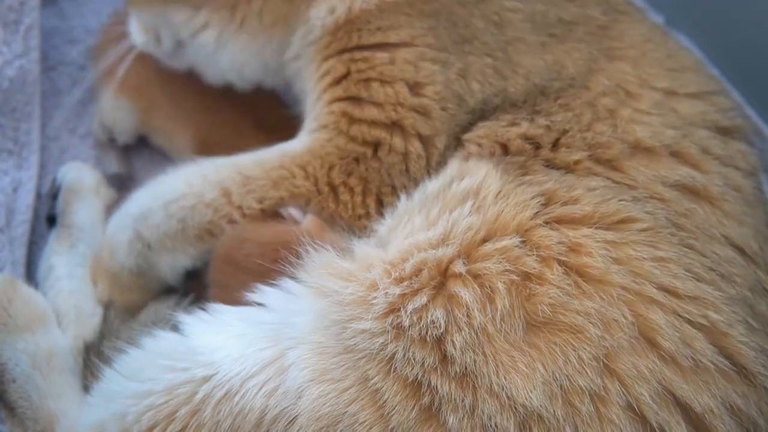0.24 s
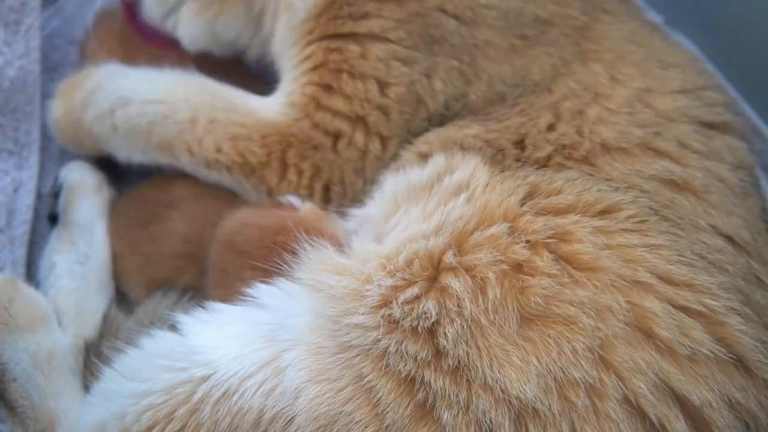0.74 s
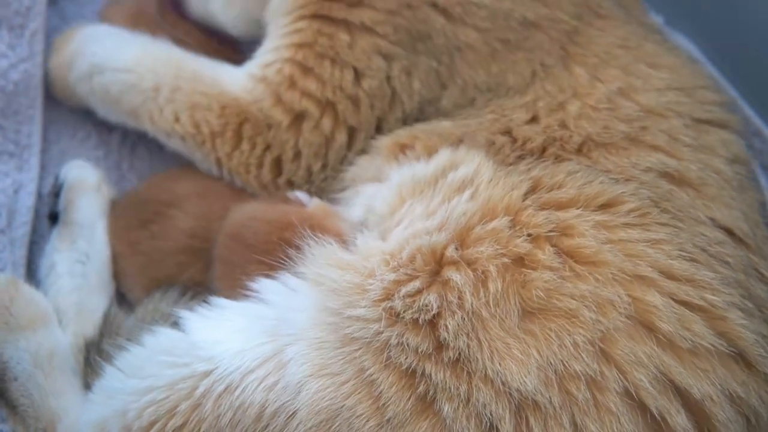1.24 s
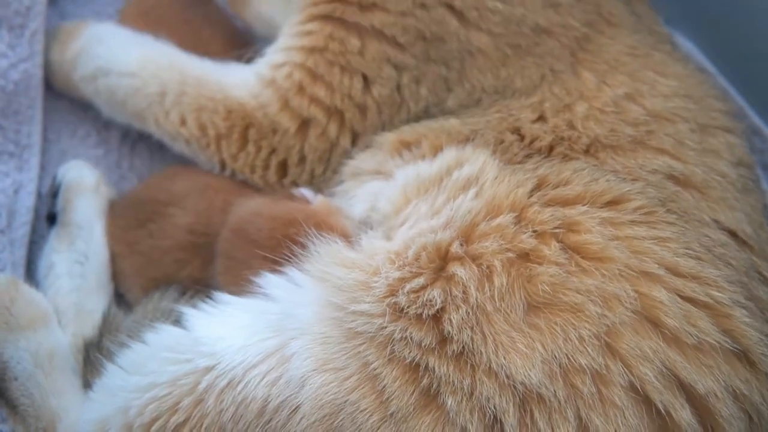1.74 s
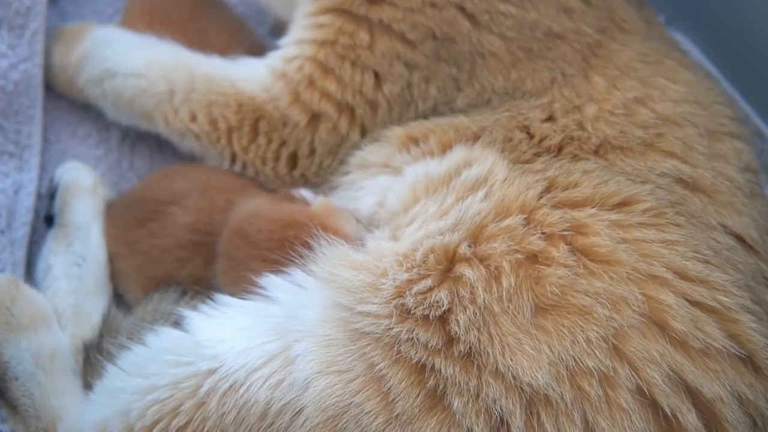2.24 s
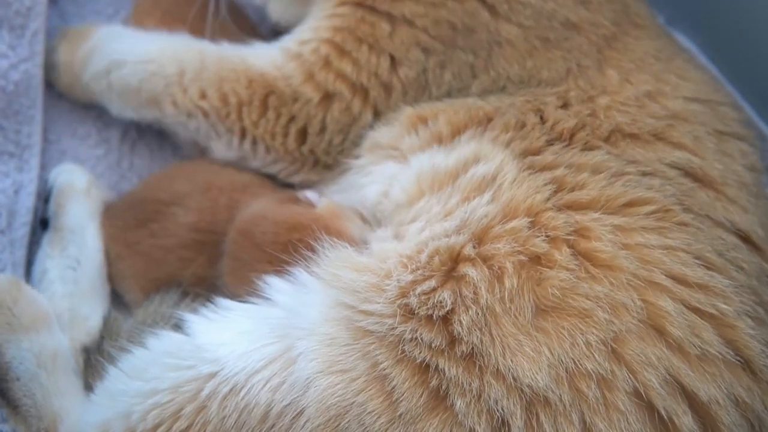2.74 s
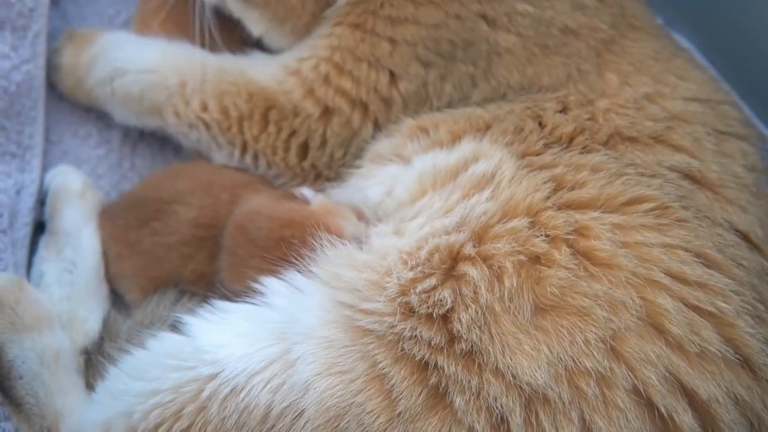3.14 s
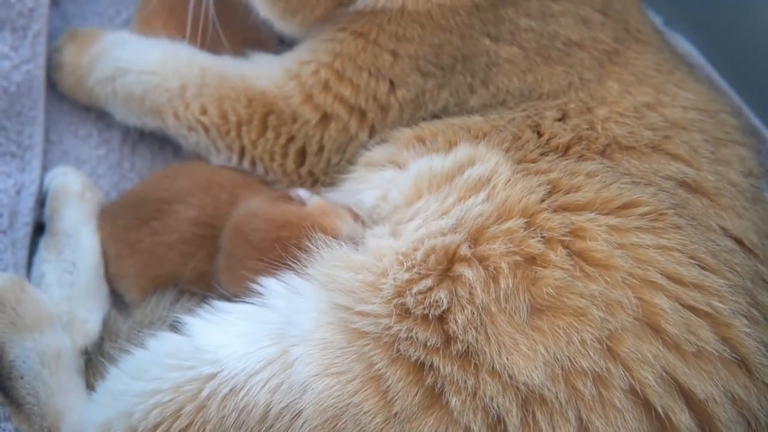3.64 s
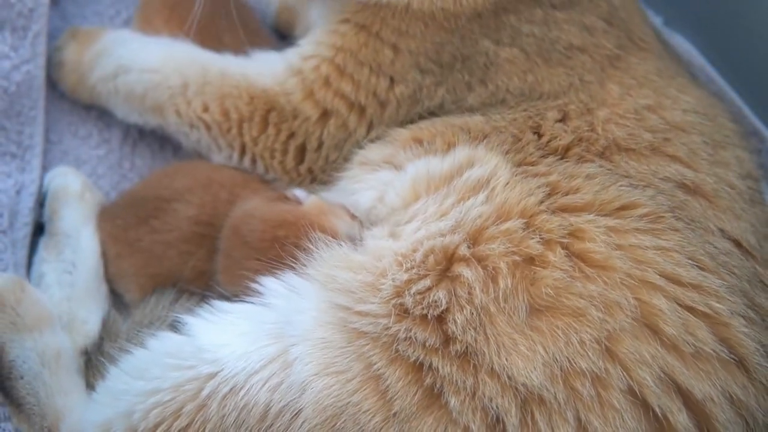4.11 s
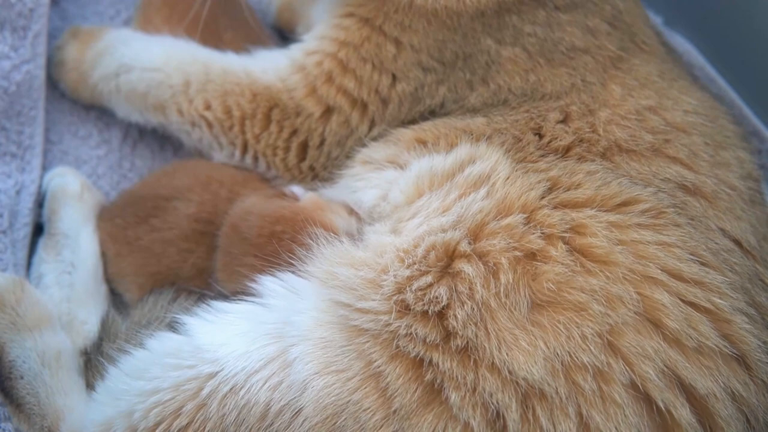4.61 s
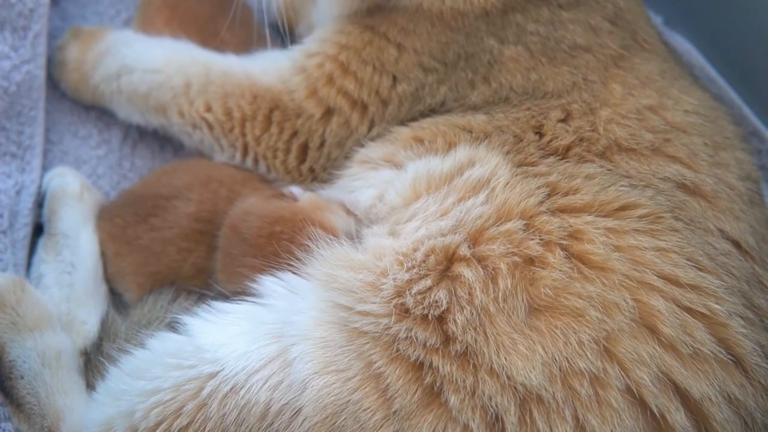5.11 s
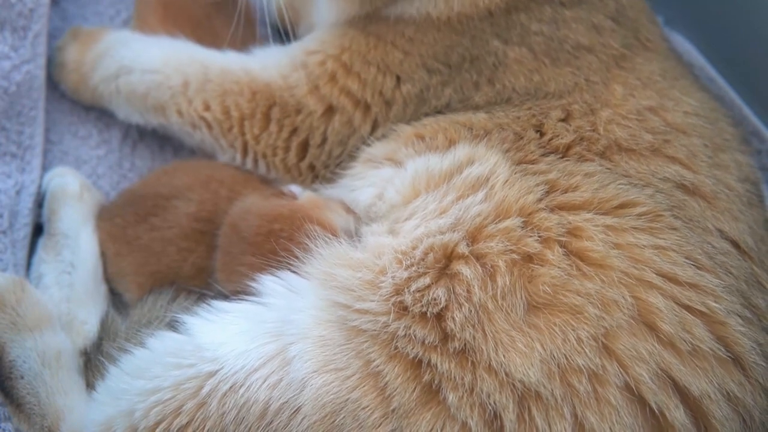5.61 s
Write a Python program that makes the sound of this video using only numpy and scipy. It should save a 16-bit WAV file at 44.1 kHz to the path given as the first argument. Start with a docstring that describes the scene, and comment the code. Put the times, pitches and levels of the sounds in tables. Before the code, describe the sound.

Indoors, over a low rumble and light microphone hiss, a cat licks her kittens at close range: quiet rasps, wet clicks and rustling fur, with a faint purr going on beneath. After a few soft bumps in the bedding, a newborn kitten gives four short, high mews, slightly to the left and hoarse at moments. The rustling dies away before the final mew while the purring continues.

```python
"""From the start, over room rumble and microphone hiss, a mother cat on a towel purrs faintly, her larynx
twitching shut in a train of puffs. She washes her litter: tongue and fur rasp, squeak and tick close by.
Between 2 and 3 s the bedding knocks dully three times. From 2.6 s a newborn kitten mews four times, a
harmonic voice that brightens as the mouth opens and at moments breaks into subharmonics. The brushing
of fur dies away before the last mew, at 5.5 s, while the purr goes on."""
import sys
import numpy as np
from scipy import signal
from scipy.fft import rfft, irfft
from scipy.io import wavfile

SR = 44100
rng = np.random.default_rng(int(sys.argv[2]) if len(sys.argv) > 2 else 0)


def unload_audio(sound):
    """Save the sound as a 16-bit wav file, at the path given as the first command line argument."""
    columns = np.transpose(np.atleast_2d(sound))
    # keep every value between -1 and 1, then stretch to whole-number steps
    steps = np.round(np.clip(columns, -1, 1) * 32767)
    wavfile.write(sys.argv[1], SR, steps.astype(np.int16))


N = 258426
CUTOFF_HZ = 15900

# background spectra, in phase and in antiphase at the ears: f/Hz, relative density/dB
ROOM_IN_PHASE = [(12, -39), (20, -3.5), (134, 2.5), (248, -5), (357, -15.5), (802, -19.5), (2260, -32.5),
                 (10800, -42.5), (16000, -46)]
ROOM_ANTIPHASE = [(12, -36), (20, 4), (107, 0), (1710, -32), (3950, -34.5), (5680, -40), (14700, -41.5),
                  (16000, -59)]
# spectrum of fur friction: f/Hz, relative density/dB
FUR_SPECTRUM = [(1000, -1), (3000, 3.5), (6000, 0), (9000, -5.5), (16000, -8.5)]
# stirring of the litter: t/s, fur hiss level/dB, base rate of faint ticks/(1/s)
STIRRING = [(0, -60, 50.6), (2.5, -59.5, 55.4), (4.2, -62.5, 33.4), (4.8, -90, 9), (5.86, -90, 7)]
# tongue and fur rasps, and thin squeaks: start t/s, end t/s, centre f/Hz, level/dB
RASP_STROKES = [(.0, .16, 6000, -62.5), (0.367, 0.475, 5800, -60), (0.561, 0.746, 5930, -58),
                (.629, .828, 2170, -54.5), (.63, .73, 12000, -67), (.7, 0.824, 6260, -62.5),
                (1.112, 1.2, 2630, -57.5), (1.573, 1.657, 3600, -63.5), (2.027, 2.165, 3030, -60.5),
                (2.3, 2.38, 5800, -62), (2.46, 2.567, 6340, -63.5), (3.613, 3.723, 6050, -60),
                (3.747, 3.842, 6000, -65.5), (4.034, 4.095, 7950, -66), (4.171, 4.205, 2940, -56)]
SQUEAK_STROKES = [(.14, .2, 1700, -56), (1.94, 1.995, 3026, -56), (1.995, 2.035, 3050, -54),
                  (2.03, 2.07, 3026, -57)]
# wet ticks of tongue and suckling: t/s, peak level/dB, ring f/Hz, ring length/cycles
WET_TICKS = [(.0779, -34, 6660, 2.5), (.167, -35, 4430, 2.5), (.2083, -32.5, 3700, 1.3),
             (.225, -36, 6000, 1.6), (.2894, -20.5, 2800, 2.36), (.2896, -38, 11500, 10),
             (.3437, -41, 7920, 5.7), (.5564, -24, 6500, 1.2), (.6792, -27.5, 2300, 0.43),
             (.7011, -26, 9850, 7.2), (.7032, -19, 7000, 1.07), (.9004, -34, 2750, 1),
             (.9409, -36.5, 9420, 4.8), (1.3029, -36.5, 5130, 4.2), (1.3668, -39.5, 2900, 5.8),
             (1.3746, -37.5, 2820, 3.5), (1.775, -34.5, 5370, 0.76), (1.7828, -32.5, 2800, 1.3),
             (1.8673, -33.5, 1790, 1.04), (1.8993, -33, 6070, 5.4), (2.0893, -33.5, 2270, 0.64),
             (2.137, -32.5, 1930, 1.65), (2.1496, -37, 3610, 3.3), (2.2975, -36.5, 6540, 3.4),
             (2.3329, -36.5, 6080, 2.9), (2.4653, -33.5, 5970, 5.7), (2.6482, -29.5, 3240, 0.44),
             (2.9487, -26.5, 3700, 0.36), (3.1383, -37.5, 6300, 2.7), (3.282, -43, 2440, 1.4),
             (3.317, -29.5, 2190, 0.57), (3.9956, -32.5, 7800, 4.4), (4.0467, -31.5, 8400, 2.3),
             (4.7488, -40, 3350, 2.0), (5.054, -19.5, 4600, 1.64), (5.516, -43, 6500, 2.3),
             (5.731, -37.5, 6960, 3)]
# dull knocks in the bedding: t/s, peak level/dB
BEDDING_KNOCKS = [(2.059, -40), (2.511, -45), (2.957, -42.5)]
# purr phrases: first twitch t/s, last twitch t/s, relative level/dB, breath (+1 in, -1 out)
PURR_PHRASES = [(.024, .292, -46, -1), (.346, .735, -43, -1), (.79, 1.0, -45, -1), (1.047, 1.261, -43, -1),
                (1.313, 1.476, -41, -1), (1.57, 1.792, -46, -1), (1.893, 2.198, -40, 1),
                (2.29, 2.782, -44, -1), (2.9, 3.283, -45, -1), (3.38, 3.836, -45, -1),
                (3.89, 4.29, -47, -1), (4.368, 4.8, -44, -1), (4.917, 5.082, -46, -1),
                (5.171, 5.333, -47, -1), (5.386, 5.836, -45, -1)]
# one contour a mew: t/s, pitch f/Hz, 1st partial level/dB, brightness (treble over 1st partial)/dB
MEW_CONTOURS = [
    [(2.602, 1561, -37, -21), (2.636, 1557, -37, -29), (2.648, 1508, -36, -30), (2.666, 1508, -36.5, -30),
     (2.724, 1586, -39, -12), (2.882, 1599, -40.5, -9), (2.904, 1577, -41, -15), (2.956, 1743, -41.5, -22),
     (2.996, 1720, -41.5, -30), (3.03, 1667, -49.5, -17)],
    [(3.312, 1170, -42.5, -26), (3.33, 1155, -42.5, -20), (3.342, 1158, -43, -10), (3.37, 1399, -41.5, -13),
     (3.426, 1458, -42.5, -7.5), (3.492, 1469, -44, -0.5), (3.636, 1457, -46, -11), (3.656, 1506, -46, -24),
     (3.672, 1730, -44.5, -20), (3.685, 1680, -52, -12)],
    [(4.341, 1395, -49, -8), (4.363, 1444, -45.5, -9.5), (4.419, 1488, -47, -8.5),
     (4.543, 1433, -46.5, -9.5), (4.599, 1313, -48.5, -16), (4.611, 1330, -47, -28),
     (4.629, 1476, -45.5, -25), (4.669, 1570, -47.5, -51), (4.719, 1500, -50.5, -33),
     (4.735, 1456, -71, -32)],
    [(5.53, 1303, -41, -44), (5.54, 1302, -41, -33.5), (5.608, 1317, -39, -35.5), (5.68, 1270, -39, -29.5),
     (5.724, 1297, -39, -29), (5.732, 1286, -39, -26), (5.744, 1275, -39, -27), (5.832, 1340, -38, -38),
     (5.85, 1410, -38, -39), (5.858, 1450, -38, -42)],
]
# one row a mew: left minus right/dB, 2nd and 3rd partial over 1st at brightness 0/dB,
# 4th over 3rd/dB, gain above 12 kHz/dB
MEW_BALANCE = [(2.5, -11, -25, -18, -9), (5.5, -2.5, -20.5, 9.5, 0), (2.5, -6, -10.5, -3.5, -0.5),
               (2.9, 3, -2.5, -7.5, -3)]
# spectral envelopes of the partials above the 4th and of the subharmonic series: f/Hz, gain/dB
THROAT_RESPONSE = [(6300, 1.5), (7800, -14.5), (9200, 2), (11500, 1), (13000, -2), (15500, -16)]
SUBHARMONIC_RESPONSE = [(700, -2), (2100, 1.5), (3400, -7.5), (4600, -2.5), (6500, -34)]
# voice breaks, every second cycle weak: start t/s, end t/s, subharmonic base level/dB, rasp (0-1)
VOICE_BREAKS = [(2.599, 2.648, -60.5, 0.68), (3.606, 3.662, -59.5, 0.45), (4.337, 4.374, -57, 0.82),
                (4.586, 4.62, -56, 0), (5.529, 5.544, -45.5, 0.16), (5.733, 5.847, -54, 0.81)]


def amp(db):
    """Amplitude ratio: a factor of ten for every 20 dB."""
    return 10 ** (np.asarray(db) / 20)


def unit_rms(x):
    """Normalisation to unit mean power."""
    return x / np.sqrt(np.mean(x ** 2) + 1e-20)


def level_at(spectrum, hz):
    """Interpolation of a spectrum on a logarithmic frequency axis."""
    freqs, levels = np.transpose(spectrum)
    return np.interp(np.log(hz), np.log(freqs), levels)


def pan(x, db):
    """Interaural level difference, left minus right."""
    return x * amp([[db / 2], [-db / 2]])


def drift(hz, size):
    """Random modulation: white noise through a two-pole low-pass, rms 1."""
    r = np.exp(-2 * np.pi * hz / SR)
    return unit_rms(signal.lfilter([1], [1, -2 * r, r * r], rng.standard_normal(size + 8000))[8000:])


def coloured(spectrum):
    """Spectral shaping of stationary white noise, rms 1."""
    hz = np.maximum(np.arange(N // 2 + 1) * SR / N, 1)
    return unit_rms(irfft(rfft(rng.standard_normal(N)) * amp(level_at(spectrum, hz)), N))


def resonance(x, hz, width_hz):
    """A damped resonator acts as a two-pole band-pass."""
    r = np.exp(-np.pi * width_hz / SR)
    return signal.lfilter([1, 0, -1], [1, -2 * r * np.cos(2 * np.pi * hz / SR), r * r], x)


def room(in_phase_db=-47, antiphase_db=-50):
    """Partial coherence: room rumble and microphone hiss as in-phase plus antiphase noise."""
    common = amp(in_phase_db) * coloured(ROOM_IN_PHASE)
    return common + amp(antiphase_db) * coloured(ROOM_ANTIPHASE) * [[1], [-1]]


def fur(hiss_db, patchy_db=1.8, crackle_db=2.5):
    """Friction noise of fur on fur: three bands, each amplitude-modulated into crackling patches."""
    hiss = coloured(FUR_SPECTRUM) + 0.17 * coloured(FUR_SPECTRUM) * [[1], [-1]]
    together, out = drift(13, N), 0
    for band_hz in ((900, 4200), (4200, 8500), (8500, 16000)):
        band = signal.sosfilt(signal.butter(2, band_hz, "band", fs=SR, output="sos"), hiss)
        out += amp(patchy_db * (together + drift(20, N)) + crackle_db * drift(250, N)) * band
    return amp(hiss_db) * out


def licking(edge_s=.025, grain_db=2.6):
    """Resonance-filtered friction noise: a wide band is heard as a rasp, a narrow one as a squeak."""
    out = np.zeros(N)
    for strokes, relative_width in ((RASP_STROKES, .3), (SQUEAK_STROKES, .05)):
        for start, end, hz, db in strokes:
            width_hz = relative_width * hz
            n = np.arange(round(start * SR), round(end * SR))
            noise = resonance(rng.standard_normal(len(n) + 500), hz, width_hz)
            noise = resonance(noise, hz, 2 * width_hz)[500:]
            swell = np.clip(np.minimum(n / SR - start, end - n / SR) / edge_s, 0, 1)
            out[n] += amp(db + grain_db * drift(44, len(n))) * swell * unit_rms(noise)
    return out


def tick(hz, cycles, tail_db=-21, tail_s=0.0033):
    """Damped oscillation, as of a tiny wet cavity popping, with scattering off the bedding; peak 1."""
    t = np.arange(900) / SR
    age = t * hz / max(cycles, .5)
    ring = np.sin(2 * np.pi * hz * t) * age * 1000. ** -age
    scatter = amp(tail_db) * rng.standard_normal(900) * np.exp(-t / tail_s) * np.sqrt(hz / SR)
    ring += np.convolve(ring, scatter)[:900]
    narrow = 1 - 1 / (max(cycles, 1) + .5)   # a longer ring fills a narrower band
    band_hz = [hz * narrow, min(hz / narrow, CUTOFF_HZ)]
    ring = signal.sosfilt(signal.butter(2, band_hz, "band", fs=SR, output="sos"), ring)
    return ring / np.abs(ring).max()


def ticks_and_knocks(per_s, faint_db=-50, spread_db=2.0, pan_db=-2.5):
    """Transients: clear ticks, knocks, and flurries of faint ticks from a modulated Poisson process."""
    out = np.zeros((2, N + 900))
    onsets = np.flatnonzero(rng.random(N) < per_s * amp(4 * drift(4, N)) / SR)
    softness, pitch, length = rng.random((len(onsets), 3)).T
    levels_db = faint_db - spread_db * np.log(softness + .1)
    faint = zip(onsets / SR, levels_db, 2500 * 4 ** pitch, 1.2 + 2.5 * length)
    knocks = [(s, db, 470, 4) for s, db in BEDDING_KNOCKS]   # 470 Hz, 4 cycles
    for s, db, hz, cycles in [*WET_TICKS, *knocks, *faint]:
        at = round(s * SR)
        out[:, at:at + 900] += amp(db) * pan(tick(hz, cycles), pan_db + rng.normal(0, 0.95))
    return out[:, :N]


def purr(twitch_hz=18.3, gain_db=8, between_db=-7, out_hz=400, in_hz=900):
    """Glottal pulse train: each twitch of the larynx gives a puff, a weaker one half a period later."""
    trains = np.zeros((2, N))   # out-breath, in-breath
    for first, last, db, breath in PURR_PHRASES:
        count = round((last - first) * twitch_hz) + 1
        scatter = rng.standard_normal((count, 4)) * [.001, .003, 1.8, 2.5]   # s, s, dB, dB
        strong_s = np.linspace(first, last, count) + 0.002095 + scatter[:, 0]
        weak_s = np.minimum(strong_s + .5 / twitch_hz + scatter[:, 1], (N - 1) / SR)
        train = trains[int(breath > 0)]
        train[(strong_s * SR).astype(int)] = breath * amp(db + scatter[:, 2])
        train[(weak_s * SR).astype(int)] = breath * amp(db + between_db + scatter[:, 3])
    t = np.arange(-400, 100) / SR
    out = 0
    for train, hz in zip(trains, (out_hz, in_hz)):
        pressure = np.exp(-2 * np.pi * hz * np.where(t < 0, -.5 * t, 2.2 * t))   # slow rise, fast fall
        puffs = signal.fftconvolve(train, pressure)[400:400 + N]
        closed_mouth = signal.butter(2, 3.5 * hz, fs=SR, output="sos")
        out += signal.sosfilt(closed_mouth, puffs)
    return amp(gain_db) * out


def voice_breaks(t, edge_s=0.0081):
    """Period doubling: envelopes of the breaks, their subharmonics and the rasp that grows in them."""
    broken, subharmonic, rasp = 0, 0, 0
    for start, end, db, share in VOICE_BREAKS:
        gate = np.clip(np.minimum(t - start, end - t) / edge_s, 0, 1)
        broken += gate
        subharmonic += amp(db) * gate
        rasp += share * gate * np.clip((t - start) / (end - start) + .2, 0, 1)
    return broken, subharmonic, rasp


def mew(contour, second_db, third_db, fourth_db, top_db, shimmer_db=2.0, attack_s=.005, release_s=.012):
    """Source and filter: harmonics of a wavering pitch; the open mouth passes a breathy treble."""
    times, *columns = np.transpose(contour)
    n = np.arange(round((times[0] - attack_s) * SR), min(round((times[-1] + release_s) * SR), N))
    t, size = n / SR, len(n)
    hz, first, brightness = [np.interp(t, times, c) for c in columns]
    broken, subharmonic, rasp = voice_breaks(t)
    waver = .006 * drift(35, size)
    flutter = .011 * amp(4 * drift(12, size)) * drift(150, size)   # comes in fits
    jitter = .09 * rasp ** 3 * drift(350, size)
    hz *= 1 + waver + flutter + jitter
    phase = 2 * np.pi * (np.cumsum(hz) / SR - hz * [[0], [2.6e-5]])   # the right ear lags by 26 us
    second = first + second_db + 0.44 * brightness
    third = first + third_db + 0.43 * brightness - 4 * broken   # 4 dB duller in a break
    treble = first + brightness - 5.5   # one partial lies 5.5 dB under the cluster
    voice = 0
    for k, db in enumerate((first, second, third, third + fourth_db), 1):
        voice += amp(db + 0.29 * k * shimmer_db * drift(250, size)) * np.sin(k * phase)
    for k in range(5, 13):   # in a break the treble is all breath
        noise = np.array([drift(600, size), drift(450, size)])
        breath = (1 + broken) * amp(-12) * (noise + noise[0])   # partly coherent at the ears
        tone = (1 - broken) * amp(2 * shimmer_db * drift(18, size))
        top = top_db * np.clip(k * hz / 1000 - 11.5, 0, 1)
        gain = amp(treble + level_at(THROAT_RESPONSE, k * hz) + top) * (k * hz < CUTOFF_HZ)
        voice += gain * (tone + breath) * np.sin(k * phase + k)
    for k in np.arange(6) + .5:
        upper_db = 12 * (np.minimum(3 * rasp, 1) - 1) * (k > 2)   # weak unless the break rasps
        hoarse = amp(upper_db + 2 * shimmer_db * drift(160, size))
        voice += subharmonic * amp(level_at(SUBHARMONIC_RESPONSE, k * hz)) * hoarse * np.sin(k * phase)
    edges = np.clip(1 + np.minimum((t - times[0]) / attack_s, (times[-1] - t) / release_s), 0, 1) ** 2
    return n, np.sqrt(2) * edges * voice


def kitten():
    """Localisation by level difference: four mews, each a little to the left."""
    out = np.zeros((2, N))
    for contour, (pan_db, *partials_db) in zip(MEW_CONTOURS, MEW_BALANCE):
        n, voice = mew(contour, *partials_db)
        out[:, n] += pan(voice, pan_db)
    return out


def scene():
    """Superposition of the room and, close by, the cat and her litter."""
    times, *columns = np.transpose(STIRRING)
    hiss_db, ticks_per_s = [np.interp(np.arange(N) / SR, times, c) for c in columns]
    background = room() + fur(hiss_db)
    washing = pan(licking(), db=-0.2) + ticks_and_knocks(ticks_per_s)
    return background + washing + pan(purr(), db=-5) + kitten()


def record(dry):
    """Band limiting: a steep low-pass removes the highest treble."""
    return signal.sosfilt(signal.cheby2(14, 70, CUTOFF_HZ + 300, fs=SR, output="sos"), dry)


dry = scene()
out = record(dry)
unload_audio(out)
```